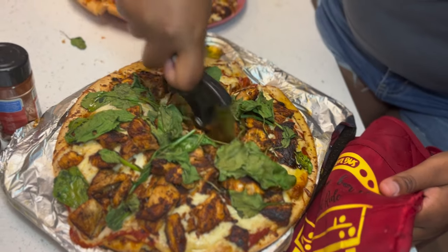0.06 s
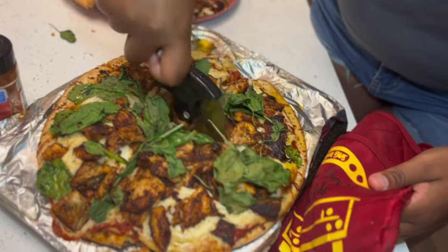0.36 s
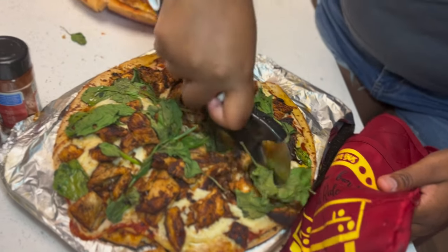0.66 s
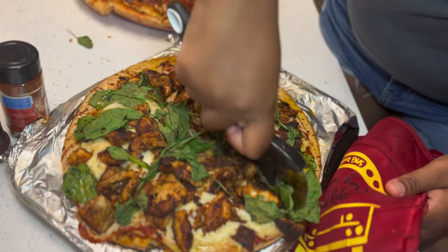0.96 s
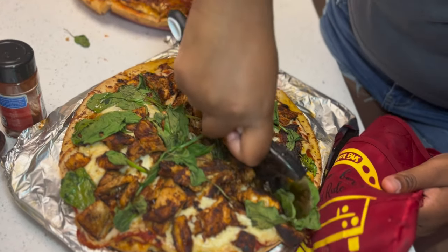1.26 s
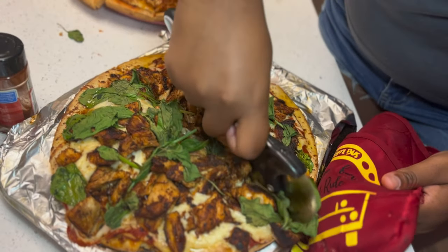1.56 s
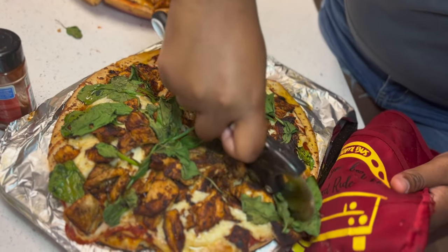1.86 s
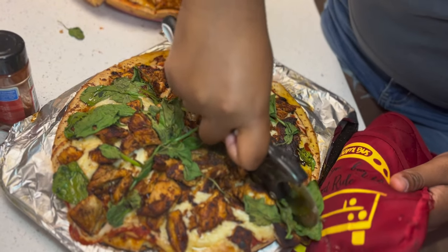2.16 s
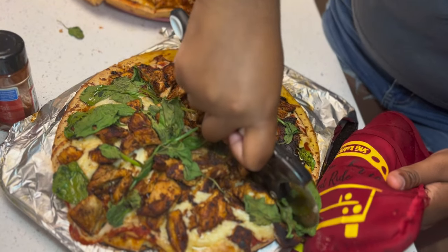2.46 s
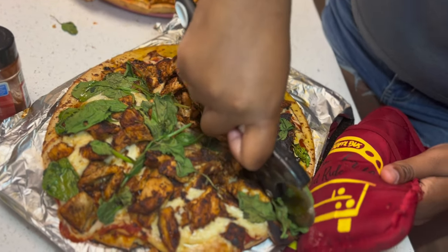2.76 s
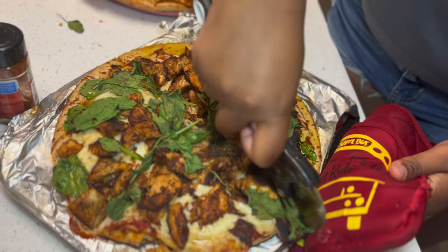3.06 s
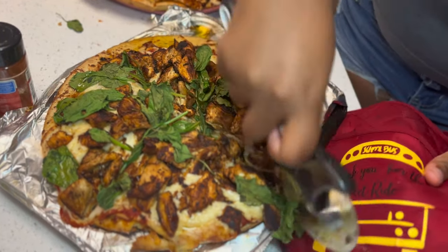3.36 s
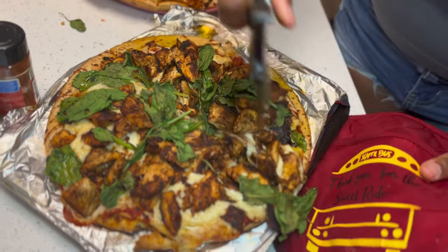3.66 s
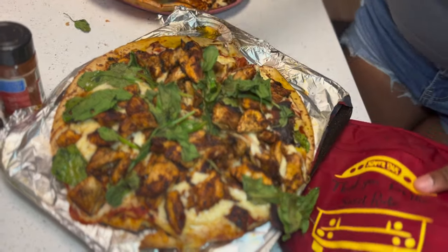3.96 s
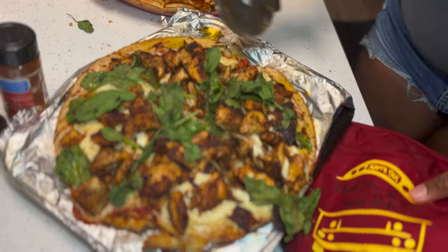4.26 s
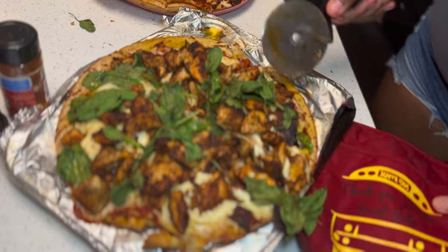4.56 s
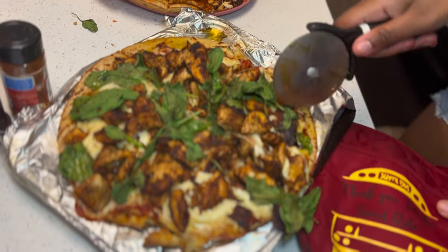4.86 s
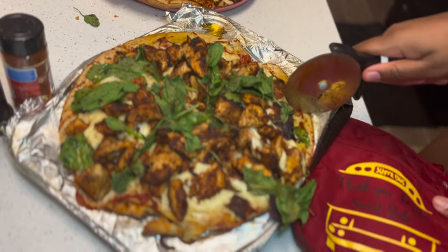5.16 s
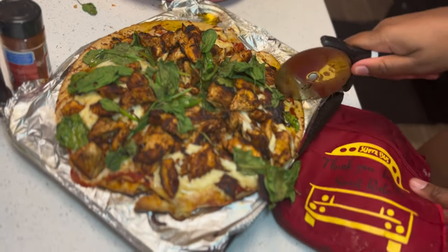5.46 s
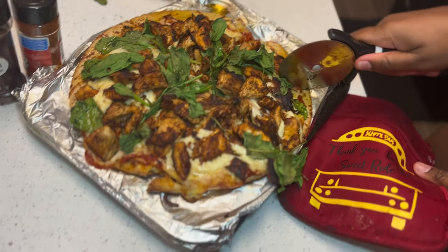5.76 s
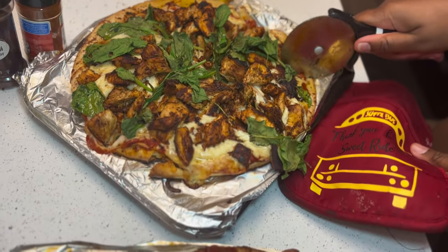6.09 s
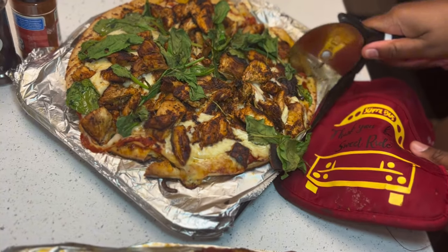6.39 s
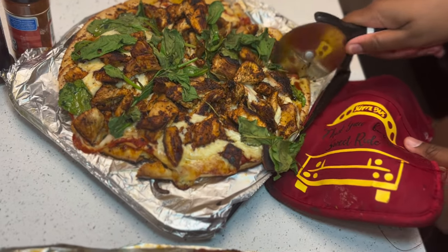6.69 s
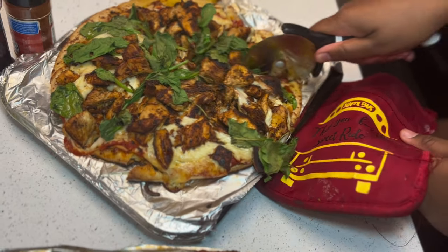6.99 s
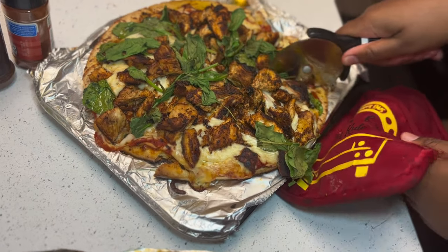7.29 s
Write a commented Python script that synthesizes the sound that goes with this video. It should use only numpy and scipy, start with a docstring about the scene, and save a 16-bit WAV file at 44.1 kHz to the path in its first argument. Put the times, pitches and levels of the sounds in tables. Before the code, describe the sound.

A pizza wheel rolls through crust on a foil-lined baking sheet, close to the microphone in a small kitchen. Scattered crisp crackles and a light knock lead to a denser scrape with small metallic pings. After a short pause the cutting resumes, with two sharp knocks on the sheet near the end. A low hum, like an engine outside, rises and falls over steady room noise.

```python
"""Pizza wheel on a foil-lined baking sheet.

Close up in a small kitchen, crust and foil crackle in showers of tiny fractures. The wheel scrapes
and knocks on the sheet, which rings briefly and shifts on the counter. A low hum, most likely a
lumpy eight-cylinder engine outside, rises and falls and booms through the walls over room noise."""
import sys
import numpy as np
from scipy import signal
from scipy.fft import rfft, irfft
from scipy.io import wavfile
from scipy.ndimage import uniform_filter1d, minimum_filter1d

SR = 44100
rng = np.random.default_rng(int(sys.argv[2]) if len(sys.argv) > 2 else 0)


def store_wav(level_fs):
    """Save 16-bit WAV to argv[1]."""
    pcm = np.round(np.clip(np.atleast_2d(level_fs), -1, 1) * 32767)
    wavfile.write(sys.argv[1], SR, pcm.T.astype(np.int16))


N = 327663
TIME_S = np.arange(N) / SR
FREQ_HZ = np.arange(N + 1) * SR / (2 * N)
TOP_HZ = 15900

# Room noise spectrum: f/Hz, gain/dB
AIR_EQ = [(25, -25.5), (60, 9), (200, 7.5), (350, -1.5), (650, -4.5), (830, -9), (1120, -9.5), (1600, -12),
          (2200, -19), (2800, -20), (3500, -21), (5000, -28), (8000, -35.5), (15000, -42.5)]
# Faint steady notes in the room noise, the lowest at overtones of the engine hum: f/Hz, width/Hz, gain/dB
STEADY_NOTES = [(191.5, 3.6, 6), (333, 5.1, 3.5), (386, 6.2, 7), (623, 7.3, -3), (895, 32, 8), (1121, 69, 6.5),
                (1283, 31, 3.5), (1628, 65, 2.5), (2158, 52, 6.5), (3310, 72, 4.5), (3740, 44, 7),
                (4140, 160, 2.5)]
# Room noise, left against right: f/Hz, correlation
AIR_CORRELATION = [(100, 0.22), (300, 0.46), (800, 0.019), (2000, 0.07), (4000, 0.14), (7000, 1)]

# Engine eases off, pulls, idles, runs evenly: t/s, speed/rpm
ENGINE_SPEED = [(0, 2338), (0.29, 1970), (0.6, 2100), (0.9, 2230), (1.25, 2314), (1.5, 2262), (1.83, 1696),
                (2.15, 1447), (2.5, 1324), (3.03, 1358), (3.7, 1698), (4.3, 1744), (5.1, 1772), (5.8, 1713),
                (6.5, 1734), (7.1, 1733), (7.43, 1790)]
# Throttle: t/s, opening (0-1)
THROTTLE_OPENING = [(0, 0), (.3, 0.6), (.5, 0.73), (.92, 0.95), (1.05, 0.4), (1.5, 0.74), (1.62, 0.14),
                    (2.2, 0.07), (3.03, 0.24), (3.1, 0.07), (4.9, 0.27), (5.6, 0.05), (7.43, 0.48)]
# Firings of one cycle: strength/dB, lateness/firing intervals
FIRING_CYCLE = [(-16.5, 0.044), (-8.5, -0.032), (-2, 0.39), (-38, -0.39), (0, -0.0071), (13, 0.11),
                (6.5, -0.22), (-9.5, -0.33)]
# Path through exhaust, walls and room: f/Hz, gain/dB
WALL_EQ = [(22, -67.5), (46, -20), (56, -14), (71, 4.5), (82, -2.5), (93, 7.5), (104, 0.5), (123, 9),
           (137, -7), (168, -4), (205, -2.5), (228, -3.5), (255, -19), (400, -29), (1500, -85.5)]
# Standing waves in the kitchen: f/Hz, width/Hz, gain/dB
ROOM_MODES = [(116.5, 13.8, 15), (190.7, 12, 7), (329.8, 11, 19.5), (404, 5.2, 12.5)]
# Hum bands: t/s, relative boom level/dB, rumble level/dB
HUM_LEVELS = [(0, -21, -4.5), (.1, -19.5, -45), (.18, -24, -19.5), (.26, -18, -30), (.32, -20.5, -32),
              (.42, -15, -31), (.55, -21, -37), (.68, -21, -43), (1, -18.5, -27.5), (1.2, -15, -29.5),
              (1.47, -14.5, -38.5), (1.62, -31, -25.5), (1.7, -24.5, -26), (1.78, -29.5, -31),
              (1.86, -25, -25), (1.93, -25.5, -32), (2.07, -25, -30), (2.17, -30.5, -32),
              (2.28, -25.5, -33), (2.42, -25.5, -29.5), (2.6, -32, -29.5), (3.03, -27.5, -33),
              (3.18, -21.5, -45), (3.3, -28, -40), (3.45, -21.5, -40), (3.58, -28, -30), (3.72, -28, -38),
              (3.9, -24.5, -35), (4.2, -21.5, -37), (4.6, -22, -41.5), (4.92, -26, -43), (5.7, -22, -35),
              (6.1, -24.5, -37.5), (6.6, -23, -37), (7.1, -23.5, -37), (7.43, -28.5, -43)]

# Sheet shifting on the counter: t/s, length/s, level/dB
SHEET_SLIDES = [(3.06, 0.2, -46), (5.787, 0.24, -44.5), (6.891, 0.22, -39), (7.144, 0.043, -41.5)]
# Sheet-on-counter friction spectrum: f/Hz, gain/dB
SLIDE_EQ = [(200, -1.5), (500, 0), (1200, -4), (1700, -11.5), (3000, -22), (7000, -28)]
# Metallic notes of wheel, sheet and foil: t/s, f/Hz, level/dB, t60/s
METAL_PINGS = [(1.346, 7000, -38, 0.026), (3.06, 1330, -29, 0.037), (3.073, 1550, -30, 0.027),
               (3.143, 1023, -30.5, 0.079), (3.1425, 2150, -34, 0.029), (3.142, 4020, -29, 0.023),
               (3.188, 1760, -37, 0.059), (5.033, 713, -33, .24), (6.2502, 4130, -12, 0.015),
               (6.252, 3740, -39, 0.19), (6.9, 636, -35, 0.26)]
# Blows on the sheet: t/s, level/dB, centre f/Hz, half-width/oct, tail gain/dB, left minus right/dB
WHEEL_KNOCKS = [(0.4252, -15.5, 590, 0.95, -30, 3), (1.9005, -24.5, 2050, 0.35, -12, 3),
                (4.9696, -26, 2290, 0.36, -16, 0), (5.0298, -13.5, 600, 0.95, -23, 2),
                (5.0315, -17, 340, 0.8, -22, 2), (6.2509, -3.5, 1070, 0.3, -14.5, 0.5),
                (6.9845, -17, 1600, 0.3, -24, 2), (6.9863, -3.5, 750, 0.95, -25, 2),
                (6.9885, -14, 580, 0.3, -16, 2), (6.999, -19, 700, 1.1, -20, 2),
                (1.17, -26, 694, 1.2, -9, 0), (2.233, -27, 1800, 0.8, -18, 0),
                (3.06, -24, 680, 0.5, -14, 0), (3.161, -26, 1500, 0.8, -20, 0),
                (3.257, -28, 2100, 0.9, -14, 0), (5.822, -23, 1040, 0.82, -21, 0),
                (5.939, -23, 990, 0.77, -20, 0), (5.968, -25, 1100, 0.74, -18, 0),
                (6.2512, -11, 700, 0.4, -16, 2), (6.2652, -13, 280, 1.8, -15, 2),
                (6.521, -22, 2400, 1.0, -15, 0)]
# Modes of the loaded sheet: f/Hz, relative level/dB, t60/s
SHEET_MODES = [(338, -17, 0.04), (427, -6.5, 0.12), (500, 0, 0.23), (667, 19.5, 0.092), (683, 11, 0.1),
               (774, -10, 0.029), (950, -12, 0.057), (1090, 22.5, 0.033), (1103, 10, 0.024),
               (1310, 3, 0.025), (1450, 16.5, 0.04), (1720, -14, 0.025), (2250, -5, 0.012),
               (2940, -1, 0.016), (3300, -1, 0.025), (4130, 20, 0.025), (4640, 4, .012)]
# Diffuse ring after a knock: f/Hz, gain/dB
TAIL_EQ = [(30, -7.5), (80, 5), (330, 15.5), (520, 4), (680, 8.5), (850, 5.5), (1150, 5.5), (1700, 1),
           (2300, -5), (3900, -9.5), (6000, -26), (15000, -45)]
# Sheet and kitchen resonances in that ring: f/Hz, width/Hz, gain/dB
TAIL_PEAKS = [(641, 50, 6), (926, 60, 5), (1168, 60, 2), (1750, 90, 3), (3122, 120, 3), (3660, 120, 6)]

# Bright foil spectrum: f/Hz, gain/dB
FOIL_EQ = [(1500, -29), (3000, -6.5), (4500, -1.5), (7500, 1.5), (10500, -4.5), (13000, -1), (15500, -1)]
# Duller crust spectrum: f/Hz, gain/dB
CRUST_EQ = [(250, -16), (600, 7), (1300, 5.5), (2000, 4.5), (2700, 1.5), (4200, 2.5), (7000, -12)]
# Wheel dragging on foil: t/s, length/s, relative level/dB, crust send/dB
WHEEL_SCRAPES = [(3.051, 0.03, -30, -2), (3.101, 0.19, -44, 4), (6.232, 0.011, -22.5, 3.5),
                 (6.26, 0.185, -55.5, 7.5), (6.496, 0.035, -41, 5), (6.871, 0.066, -38.5, 0)]
# Wheel in the pizza: start/s, end/s
CUT_SPANS = [(.07, 2.95), (5.15, 7.3)]
# Pushes of the wheel: t/s, length/s, relative level/dB
WHEEL_PUSHES = [(.075, 0.084, -43.5), (.48, 0.15, -44), (.83, 0.048, -39), (.99, 0.017, -42.5),
                (1.14, 0.035, -38), (1.6, 0.13, -48), (1.885, 0.022, -46), (3.05, .03, -35),
                (3.11, 0.19, -37.5), (5.19, .04, -58), (5.93, .05, -46), (6.225, 0.096, -43),
                (6.44, 0.13, -38), (6.65, 0.14, -45), (6.88, 0.079, -37), (7, 0.08, -39)]
# Snaps of crust and foil: t/s, relative level/dB, time to -20 dB/s, crust send/dB
CRUST_SNAPS = [(0.1455, -35.5, 0.006, -8), (0.3005, -40.5, 0.007, -3), (0.4242, -22, 0.0099, -14),
               (0.5507, -29, 0.0039, -9), (0.5658, -29, 0.0055, -14), (0.8457, -33, 0.0088, -3),
               (0.8664, -32, 0.018, -7), (0.8897, -33, 0.0112, -11), (0.945, -36.5, 0.0079, -3),
               (1.1484, -33.5, 0.0092, -15), (1.1694, -30, 0.0091, 2.5), (1.3291, -40.5, 0.0075, -1),
               (1.3464, -34, 0.0036, -14), (1.4397, -33, 0.0044, -19), (1.4941, -33.5, 0.0065, -1),
               (1.6095, -37, 0.006, -8), (1.6490, -40, 0.0036, -18), (1.6712, -34, 0.01, -5),
               (1.7248, -36, 0.0053, -6), (1.7383, -29.5, 0.0097, -3.5), (1.7675, -42, 0.005, -8),
               (1.8055, -43, 0.005, -8), (1.9002, -18.5, 0.0033, -9), (2.0125, -36.5, 0.0086, -4),
               (2.0635, -40.5, 0.0091, -18), (2.1699, -32, 0.005, -12), (2.2047, -40, 0.0058, -18),
               (2.2325, -27.5, 0.0084, -13), (2.4715, -43, 0.005, -8), (2.5281, -29, 0.0072, -5),
               (2.5321, -30.5, 0.012, -1.5), (2.6876, -39, 0.017, 2), (2.7305, -43, 0.007, -8),
               (2.7819, -32, 0.0064, -12), (2.9085, -42, 0.0061, -8), (2.9245, -42, 0.0054, -10),
               (3.0545, -31, 0.009, -4), (3.0655, -29.5, 0.0097, -8), (3.0735, -31.5, 0.011, -1),
               (3.1201, -26.5, 0.013, -7), (3.141, -28.5, 0.009, 2), (3.147, -26, 0.011, -10),
               (3.1607, -28, 0.0062, -4), (3.1902, -34, 0.0068, -3), (3.2151, -36.5, 0.0087, -4),
               (3.2565, -34.5, 0.011, 6.5), (3.2746, -27.5, 0.0061, -14), (3.286, -31, 0.007, -10),
               (3.4158, -40, 0.013, -23), (4.9697, -28.5, 0.0076, -1), (5.03, -31, 0.0086, 2.5),
               (5.1635, -38.5, 0.006, -8), (5.2148, -31.5, 0.019, -4), (5.3705, -40.5, 0.006, -8),
               (5.3895, -39, 0.005, -8), (5.4228, -41.5, 0.0083, 6), (5.4365, -37.5, 0.005, -6),
               (5.5162, -37, 0.0044, -2), (5.5734, -37.5, 0.0069, -3), (5.7565, -38.5, 0.0052, 3.5),
               (5.9357, -39.5, 0.017, 5), (5.9744, -31, 0.0093, -0.5), (6.0345, -39.5, 0.007, -6),
               (6.0605, -37, 0.0076, -6), (6.1497, -31.5, 0.007, 1), (6.2396, -27, 0.009, 4.5),
               (6.2486, -17, 0.0063, 6), (6.3515, -36.5, 0.0043, -8), (6.3975, -36.5, 0.0055, -8),
               (6.4483, -35.5, 0.016, -1), (6.4804, -34, 0.017, 2), (6.4913, -30.5, 0.004, 2),
               (6.503, -34, 0.0088, -8), (6.5214, -28, 0.011, -1), (6.5784, -24.5, 0.005, -4),
               (6.6283, -36, 0.0061, -18), (6.6691, -31.5, 0.012, -6), (6.7105, -36.5, 0.005, -8),
               (6.7797, -34, 0.0055, 0), (6.9101, -30, 0.0095, -7), (6.9248, -24, 0.0079, -9),
               (6.9838, -33, 0.011, 13.5), (7.0129, -27.5, 0.012, -23), (7.04, -31, 0.0059, -18),
               (7.076, -33, 0.007, -8), (7.2704, -36.5, 0.0042, -10)]

# Phase between the two microphones: f/Hz, left lead/rad
MIC_PHASE = [(0, 0), (2000, 0), (3000, .7), (5000, 0), (7600, 0), (10000, -3.1), (12200, -6.2),
             (13600, -6.4), (15200, -9.4)]


def undb(db):
    """Decibels to gain."""
    return 10 ** (np.asarray(db) / 20)


def set_rms(x, db):
    """Scale to an rms level."""
    return x * undb(db) / np.sqrt(np.mean(x ** 2))


def pan(db):
    """Stereo gains for a left-minus-right level."""
    return undb(np.array([[db], [-db]]) / 2)


def on_log_axis(points):
    """Interpolate (f/Hz, value) points over log frequency."""
    hz, value = np.transpose(points)
    return np.interp(np.log(FREQ_HZ + 1), np.log(hz), value)


def fft_filter(x, gain):
    """Apply one gain per frequency."""
    return irfft(rfft(x, 2 * N) * gain)[..., :N]


def colour(x, eq, peaks=()):
    """Minimum-phase filter from an outline and resonance peaks."""
    peaks_db = sum(db / (1 + (2 * (FREQ_HZ - hz) / width_hz) ** 2) for hz, width_hz, db in peaks)
    cepstrum = irfft(np.log(undb(on_log_axis(eq) + peaks_db)))
    cepstrum[1:N] *= 2
    cepstrum[N + 1:] = 0
    return fft_filter(x, np.exp(rfft(cepstrum)))


def add(track, start_s, sound):
    """Mix a sound in at a time."""
    i = max(int(start_s * SR), 0)
    track[..., i:i + sound.shape[-1]] += sound[..., :N - i]


def wander(rate_hz):
    """Smooth random curve, spread near 1."""
    step = int(SR / rate_hz)
    return 1.27 * uniform_filter1d(np.repeat(rng.standard_normal(N // step + 1), step), step)[:N]


def grains(per_s, spread_db):
    """Tiny fractures or slips: random impulses of uneven size, rms 1."""
    size = undb(spread_db * np.minimum(rng.exponential(size=N), 4))
    return set_rms((rng.random(N) < per_s / SR) * rng.choice([-1, 1], N) * size, 0)


def stroke(start_s, length_s, rise_s, fall_s):
    """Contact envelope: rise, hold, decay."""
    age_s = np.maximum(TIME_S - start_s, 0)
    return (1 - np.exp(-age_s / rise_s)) * np.exp(-np.maximum(age_s - length_s, 0) / fall_s)


def room(x, t60_s, wet_db):
    """Direct sound plus duller reflections, independent left and right."""
    t = TIME_S[:SR // 2]
    tail = rng.standard_normal((2, len(t))) * undb(-60 * t / t60_s) * (t > 0.002)
    tail = signal.sosfilt(signal.butter(1, 6000, fs=SR, output="sos"), tail)
    tail *= undb(wet_db) / np.sqrt(np.sum(tail ** 2) / 2)
    return x + signal.fftconvolve(np.atleast_2d(x), tail, axes=1)[:, :N]


def kitchen_air(level_db=-33.5, waver_db=0.55):
    """Steady room noise with faint notes, partly correlated between channels."""
    correlation = on_log_axis(AIR_CORRELATION)
    mid = fft_filter(rng.standard_normal(N), np.sqrt(1 + correlation))
    side = fft_filter(rng.standard_normal(N), np.sqrt(1 - correlation))
    air = colour(np.array([mid + side, mid - side]), AIR_EQ, STEADY_NOTES)
    return set_rms(air, level_db) * undb(waver_db * wander(rate_hz=10)) * pan(db=0.5)


def exhaust_pulses(rpm, throttle, jitter=0.03, scatter_db=2.1, idle_scatter_db=5.0, idle_evening=0.36):
    """Eight unequal firings per two turns; a shut throttle makes them more alike but less steady."""
    phase = np.cumsum(rpm) * 4 / 60 / SR  # in firings
    firing = np.arange(int(phase[-1]))
    strength_db, lateness = np.array(FIRING_CYCLE)[firing % len(FIRING_CYCLE)].T
    timing_noise, level_noise = rng.standard_normal((len(firing), 2)).T
    shut = np.clip(1 - 5.1 * np.interp(firing, phase, throttle), 0, 1)
    lumpiness = 1 - idle_evening * shut
    onsets = np.searchsorted(phase, firing + lateness * lumpiness + jitter * timing_noise)
    pulse_db = strength_db * lumpiness + (scatter_db + idle_scatter_db * shut) * level_noise
    pulses = np.bincount(np.minimum(onsets, N - 1), undb(pulse_db), N)
    return pulses - uniform_filter1d(pulses, SR // 20)


def through_walls(x, smear_s=0.0204, cutoff_hz=900):
    """Walls pass the bass; unequal paths delay some notes and round each throb."""
    indoors = colour(x, WALL_EQ, ROOM_MODES)
    delay_s = smear_s * np.sin(np.pi * FREQ_HZ / ROOM_MODES[0][0]) ** 2
    lag_rad = 2 * np.pi * np.cumsum(delay_s) * FREQ_HZ[1]
    return fft_filter(indoors, np.exp(-1j * lag_rad) / (1 + (FREQ_HZ / cutoff_hz) ** 4))


def engine(cruise_rpm=1730, boom_from_hz=99, boom_to_hz=150, boom_trim_db=0.64):
    """Engine outside: deep rumble, room boom, and a growl that grows with throttle and speed."""
    rpm = np.interp(TIME_S, *np.transpose(ENGINE_SPEED))
    throttle = np.interp(TIME_S, *np.transpose(THROTTLE_OPENING))
    exhaust = through_walls(exhaust_pulses(rpm, throttle))
    times_s, *levels_db = np.transpose(HUM_LEVELS)
    boom_db, rumble_db = (np.interp(TIME_S, times_s, db) for db in levels_db)
    growl_db = -41.5 + 8.8 * throttle + 20.2 * np.log2(rpm / cruise_rpm)
    low = 1 / (1 + (FREQ_HZ / boom_from_hz) ** 30)
    high = 1 - 1 / (1 + (FREQ_HZ / boom_to_hz) ** 30)
    hum = 0
    for band, db in ((low, rumble_db), (1 - low - high, boom_db + boom_trim_db), (high, growl_db)):
        part = fft_filter(exhaust, band)
        power = uniform_filter1d(uniform_filter1d(part ** 2, size=4400), size=2200)
        hum += part / np.sqrt(power) * undb(db)
    return hum * pan(db=-1)


def slides(judder_db=2):
    """The sheet rubs dully on the counter."""
    push = sum(undb(db) * stroke(start_s, length_s, rise_s=0.014, fall_s=0.082)
               for start_s, length_s, db in SHEET_SLIDES)
    friction = set_rms(colour(grains(per_s=2200, spread_db=1), SLIDE_EQ), 0)
    return friction * push * undb(judder_db * wander(rate_hz=50))


def pings(rise_s=0.0012):
    """The wheel or a foil crease springs free and rings briefly on one note."""
    track, t = np.zeros(N), TIME_S[:9000]
    for start_s, hz, db, t60_s in METAL_PINGS:
        envelope = (1 - np.exp(-t / rise_s)) * undb(db - 60 * t / t60_s)
        add(track, start_s, np.sin(2 * np.pi * hz * t) * envelope)
    return track


def knocks(ring_db=-9, tail_rise_s=0.0042, tail_t60_s=0.3):
    """The wheel strikes the sheet: a thwack, modes damped by the food, a diffuse tail."""
    t = TIME_S[:SR // 2]
    hz, mode_db, t60_s = np.transpose(SHEET_MODES)
    modes = np.sin(2 * np.pi * hz[:, None] * t) * undb(mode_db[:, None] - 60 * t / t60_s[:, None])
    impulse = 1.0 * (t == 0)
    tail_envelope = (1 - np.exp(-t / tail_rise_s)) * undb(-60 * t / tail_t60_s)
    blows, tails = np.zeros((2, N)), np.zeros((2, N))
    for start_s, db, centre_hz, half_oct, tail_db, pan_db in WHEEL_KNOCKS:
        # Place and hardness of the contact set the excited band.
        edges_hz = np.minimum(centre_hz * 2.0 ** np.array([-half_oct, half_oct]), TOP_HZ)
        thwack = signal.sosfilt(signal.butter(5, edges_hz, "band", fs=SR, output="sos"), impulse)
        excitation = 1 / (1 + (np.log2(hz / centre_hz) / half_oct) ** 4)
        ring = excitation @ modes
        blow = thwack / np.abs(thwack).max() + undb(ring_db) * ring / np.abs(ring).max()
        diffuse = rng.standard_normal((2, len(t))) + 0.23 * rng.standard_normal(len(t))
        gains = undb(db) * pan(pan_db)
        add(blows, start_s, gains * blow)
        add(tails, start_s, gains * undb(tail_db) * diffuse * tail_envelope)
    return room(blows, t60_s=0.17, wet_db=-16) + colour(tails, TAIL_EQ, TAIL_PEAKS)


def scrapes(catch_db=3, foil_db=1, crust_db=1.5):
    """The wheel catches and slips on the foil in a dense, uneven rasp."""
    rasp = grains(per_s=3000, spread_db=-1) * set_rms(undb(catch_db * wander(rate_hz=130)), 0)
    foil, crust = np.zeros(N), np.zeros(N)
    for start_s, length_s, db, send_db in WHEEL_SCRAPES:
        scrape = rasp * undb(db) * stroke(start_s, length_s, rise_s=0.016, fall_s=0.012)
        foil += scrape
        crust += scrape * undb(send_db)
    return undb(foil_db) * colour(foil, FOIL_EQ) + undb(crust_db) * colour(crust, CRUST_EQ)


def creases(fractures, low_hz=3000, high_hz=14500, low_decay_s=0.0007, count=12):
    """Each fracture rings one foil crease or crust flake; higher ones die faster. Energy is kept."""
    t = TIME_S[:400]
    crease = rng.integers(0, count, N)
    rung = 0
    for k, hz in enumerate(np.geomspace(low_hz, high_hz, count)):
        ring = np.cos(2 * np.pi * hz * t) * np.exp(-t / low_decay_s * hz / low_hz)
        ring *= np.sqrt(hz / np.sum(ring ** 2))
        rung += signal.oaconvolve(fractures * (crease == k), ring)[:N]
    return rung * np.sqrt(np.sum(fractures ** 2) / np.sum(rung ** 2))


def crackle(gain_db=-9, rolling_db=-56, patchy_db=1):
    """Flakes and creases give way in patches under the wheel, most at each push."""
    contacts = WHEEL_PUSHES + [(start_s, end_s - start_s, rolling_db) for start_s, end_s in CUT_SPANS]
    power = sum((undb(db) * stroke(start_s, length_s, rise_s=0.0027, fall_s=0.033)) ** 2
                for start_s, length_s, db in contacts)
    flakes = creases(grains(per_s=700, spread_db=4))
    patches = set_rms(undb(patchy_db * wander(rate_hz=89)), 0)
    return undb(gain_db) * colour(flakes * np.sqrt(power) * patches, FOIL_EQ)


def snaps(rise_s=0.0003, foil_db=-6, crust_db=-2, samples=2000):
    """Sudden showers of fractures: brightness from the foil, body from the crust."""
    foil, crust, t = np.zeros(N), np.zeros(N), TIME_S[:samples]
    fractures = grains(per_s=5000, spread_db=3)
    for k, (start_s, db, length_s, send_db) in enumerate(CRUST_SNAPS):
        envelope = (1 - np.exp(-t / rise_s)) * undb(-20 * (t / length_s) ** 2)
        burst = fractures[k * samples:(k + 1) * samples] * envelope
        burst *= undb(db) * np.sqrt(np.sum(envelope ** 2) / np.sum(burst ** 2))
        add(foil, start_s, burst)
        add(crust, start_s, burst * undb(send_db))
    return undb(foil_db) * colour(creases(foil), FOIL_EQ) + undb(crust_db) * colour(crust, CRUST_EQ)


def scene():
    """Cutting and knocks in the kitchen, over engine hum and room noise."""
    cutting = room(snaps() + pings() + scrapes() + crackle() + slides(), t60_s=0.092, wet_db=-7.5)
    return cutting + knocks() + engine() + kitchen_air()


def limiter(x, ceiling_db=-0.9, recovery_db_per_s=29, samples=45):
    """Gain drops just ahead of a peak over the ceiling, then recovers steadily."""
    over_db = np.maximum(20 * np.log10(np.abs(x).max(axis=0) + 1e-9) - ceiling_db, 0)
    ramp_db = recovery_db_per_s * TIME_S
    gain_db = ramp_db - np.maximum.accumulate(over_db + ramp_db)
    return x * undb(uniform_filter1d(minimum_filter1d(gain_db, samples), samples))


def record(dry):
    """Two closely spaced microphones, apart in treble phase; limiter; steep low-pass."""
    half_lead = np.exp(0.5j * np.interp(FREQ_HZ, *np.transpose(MIC_PHASE)))
    stereo = fft_filter(dry, np.array([half_lead, half_lead.conj()]))
    lowpass = signal.ellip(8, 0.2, 70, TOP_HZ, fs=SR, output="sos")
    return signal.sosfilt(lowpass, limiter(stereo))


dry = scene()
out = record(dry)
store_wav(out)
```